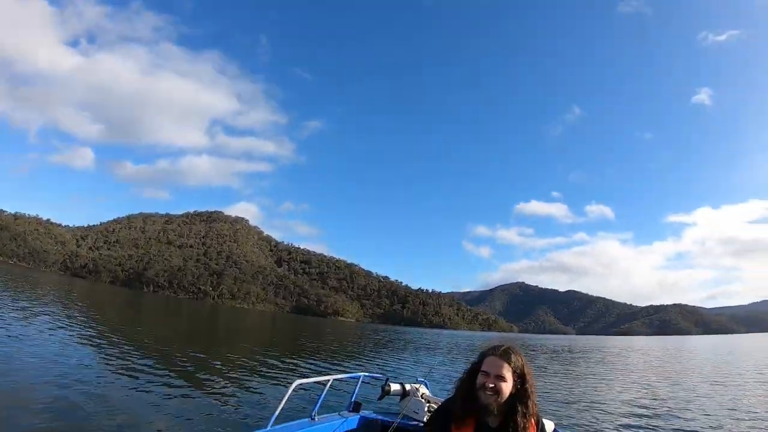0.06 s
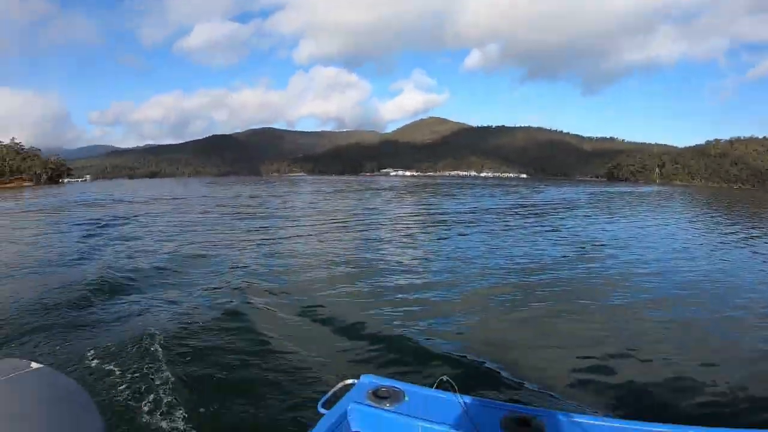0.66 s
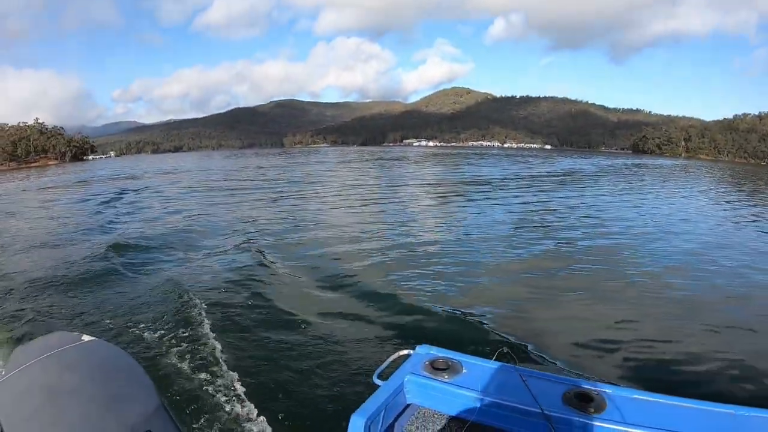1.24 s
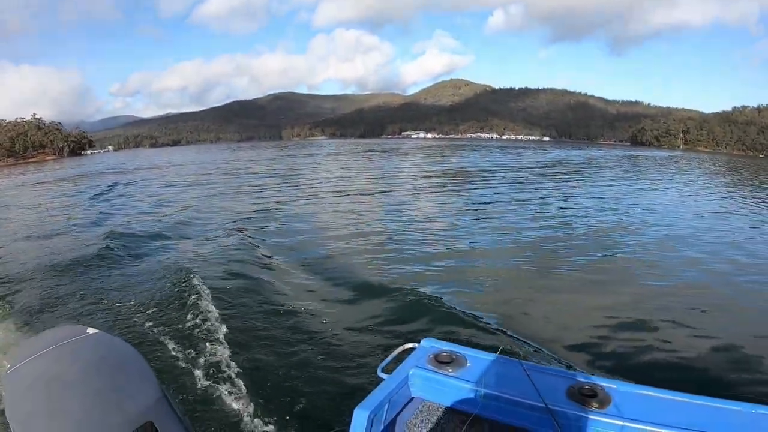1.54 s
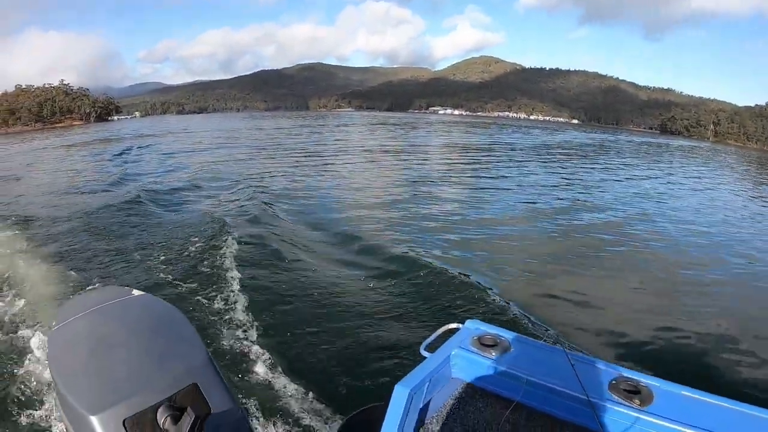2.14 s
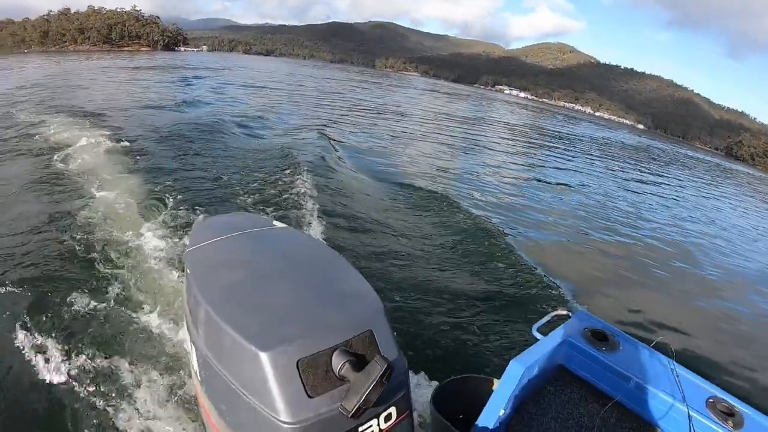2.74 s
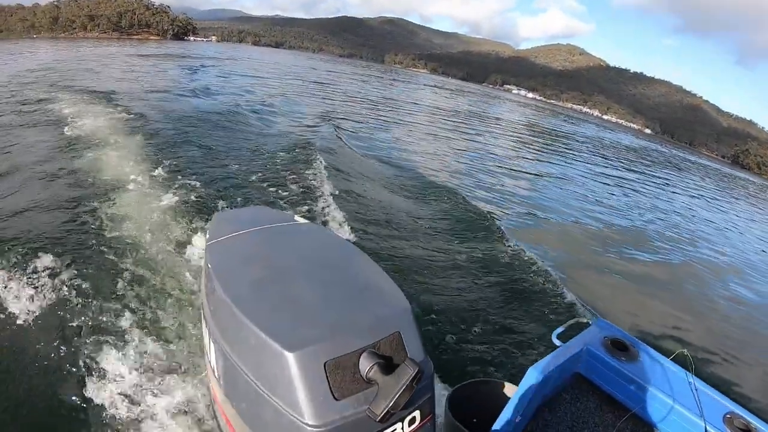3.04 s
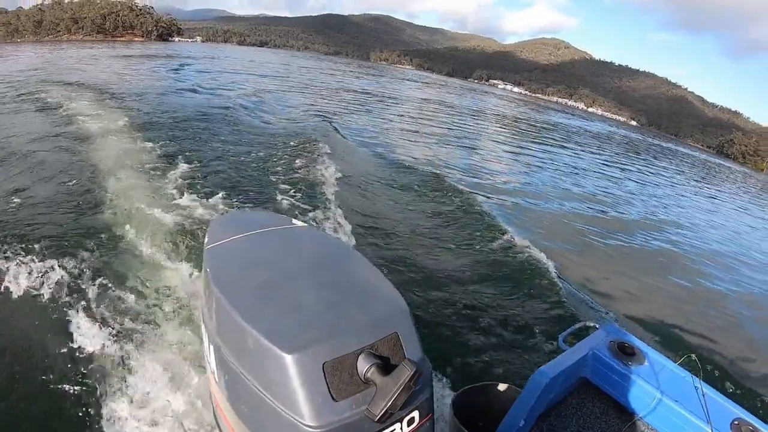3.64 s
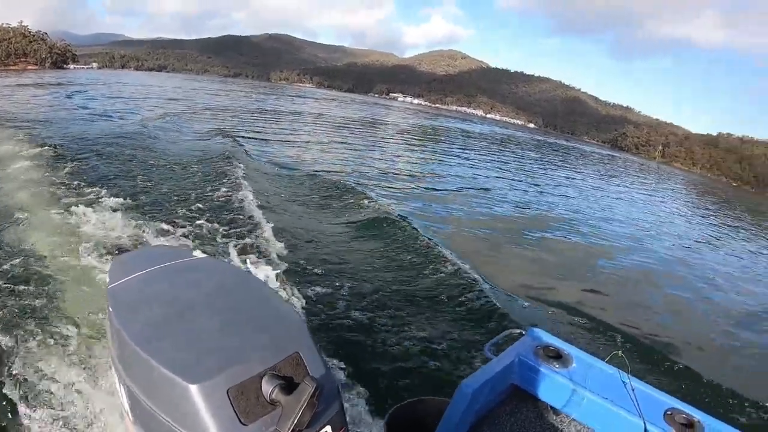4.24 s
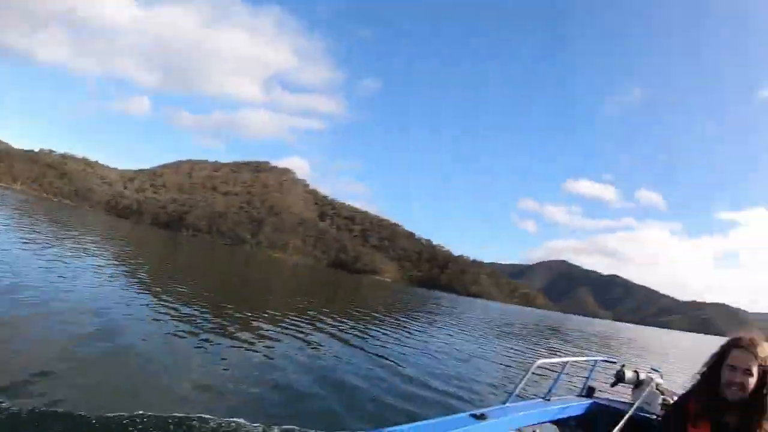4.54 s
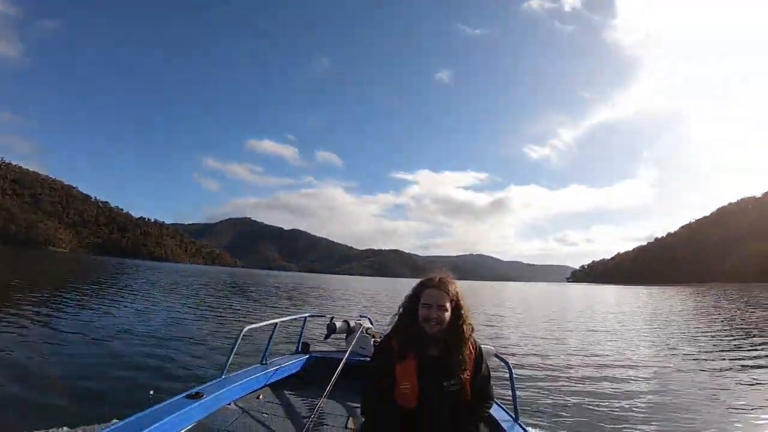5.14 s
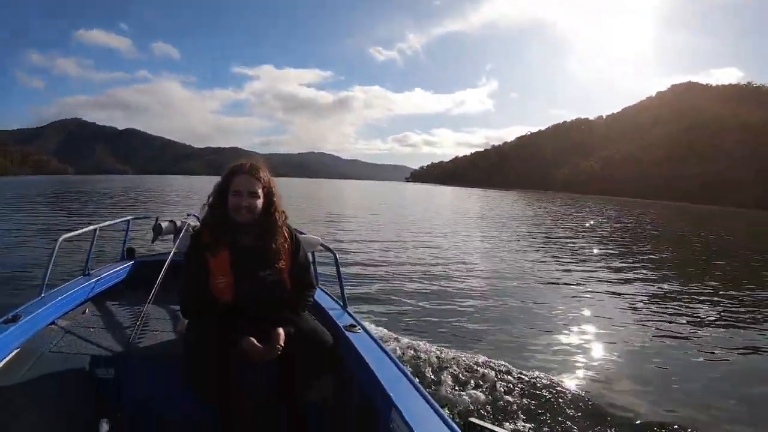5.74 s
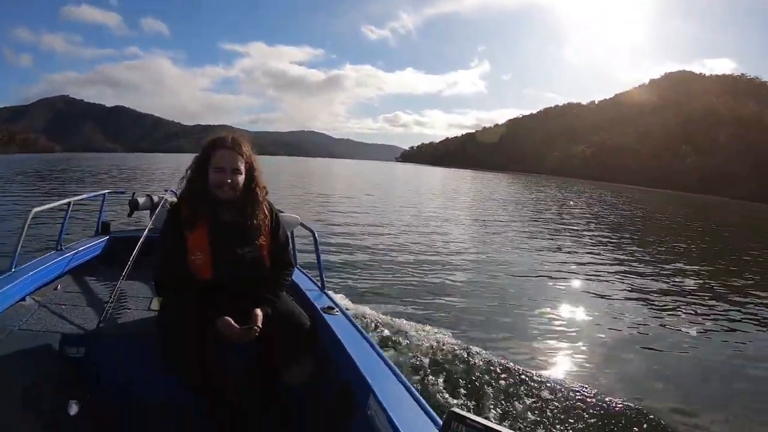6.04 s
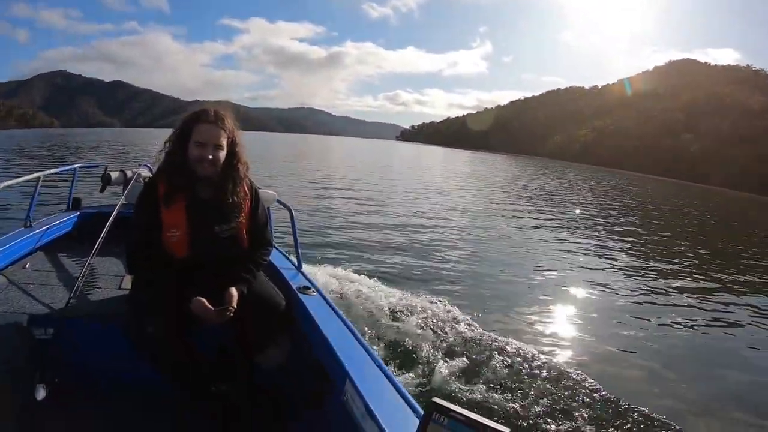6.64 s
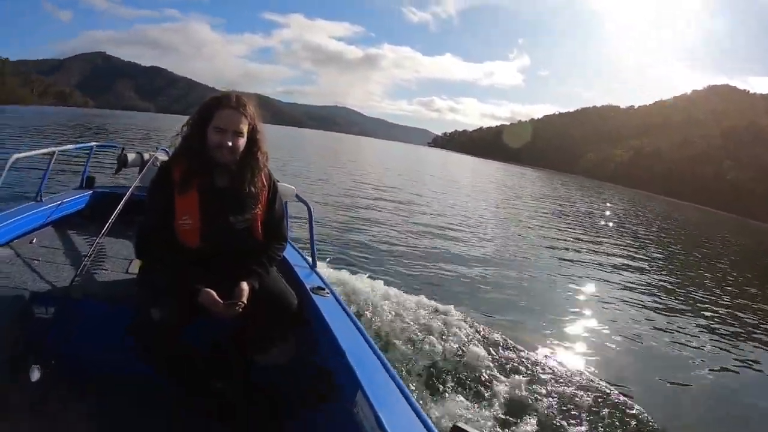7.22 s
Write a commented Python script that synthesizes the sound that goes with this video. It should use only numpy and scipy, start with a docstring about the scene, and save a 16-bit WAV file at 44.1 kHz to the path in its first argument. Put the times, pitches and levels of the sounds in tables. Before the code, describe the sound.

An outboard motor on a small metal boat runs slowly, then speeds up after about a second and settles into a throbbing, clattering cruise. Water rushes and gurgles along the hull throughout. The wake fizzes and plinks, brightest in the middle as the microphone on board turns toward the back. A few small waves slap the hull, a loose fitting chinks faintly, and light wind rumbles.

```python
"""An outboard motor lopes slowly, then picks up to a throbbing cruise, pushing a small metal boat over a lake.
Its three two-stroke cylinders boom in the hull and clatter under the cover; misfires add deep thuds.
Bubbles and drops make the wake fizz and plink, brighter when the hand-held camera on board faces back.
Small waves slap the hull, a loose fitting chinks, and a little wind rumbles on the microphone."""
import sys
import numpy as np
from scipy import signal
from scipy.fft import rfft, irfft, next_fast_len
from scipy.io import wavfile
from scipy.ndimage import uniform_filter1d

SR = 44100
rng = np.random.default_rng(int(sys.argv[2]) if len(sys.argv) > 2 else 0)


def wav_record(signal):
    """Record a signal, one row per channel, as 16-bit PCM in the file named by sys.argv[1]."""
    frames = np.transpose(np.atleast_2d(signal))
    bounded = np.clip(frames, -1, 1)
    # unit amplitude maps onto the largest positive 16-bit level
    quanta = np.round(bounded * 32767).astype(np.int16)
    wavfile.write(sys.argv[1], SR, quanta)


N = 329823
T = np.arange(N) / SR


def undb(db):
    """Turn decibels into a gain."""
    return 10 ** (np.asarray(db) / 20)

def unit(x):
    """Scale a signal to an average (rms) level of 1."""
    return x / np.sqrt(np.mean(x ** 2))

def curves(table, at=T):
    """Look up the other columns of a table by its first: by time, or by a control."""
    first, *columns = np.transpose(table)
    return [np.interp(at, first, column) for column in columns]

def wander(rate):
    """A smooth random wobble that turns about rate times a second."""
    step = int(SR / rate)
    return 0.97 * uniform_filter1d(np.repeat(rng.standard_normal(N // step + 1), step), step)[:N]

def colour(x, points):
    """Shape the tone with a curve through (Hz, dB) points."""
    hz, db = np.transpose(points)
    size = next_fast_len(N)
    bins_hz = np.maximum(np.arange(size // 2 + 1) * SR / size, 1)
    gain = undb(np.interp(np.log(bins_hz), np.log(hz), db))
    return irfft(rfft(x, size) * gain, size)[..., :N]

def ring(x, modes):
    """Pass a sound through side-by-side resonances of (Hz, width in Hz, dB)."""
    return sum(undb(db) * signal.lfilter(*signal.iirpeak(hz, max(hz / width, 1), fs=SR), x)
               for hz, width, db in modes)

def noise():
    """Two unrelated noises: mid (what both ears share) and side (how they differ)."""
    return rng.standard_normal((2, N))

# How wide the sound is. Each row: frequency in Hz, gain of the side in dB.
STEREO_WIDTH = [(60, -20), (110, -56), (200, -21.5), (380, -14), (700, -9), (1290, -5), (2380, -6.5),
                (4400, -8.5), (8120, 2), (15000, -5)]

def stereo(pair):
    """Turn mid and side into left and right; the bass stays in the middle."""
    mid, side = unit(pair[0]), colour(unit(pair[1]), STEREO_WIDTH)
    return np.array([mid + side, mid - side])

def fade(x, seconds):
    """Give every pulse a dying tail."""
    return signal.lfilter([1], [1, -np.exp(-1 / (seconds * SR))], x)

def grains(rate, spread_db):
    """About rate tiny impacts a second, most of them weak; mid and side."""
    size = undb(spread_db * np.minimum(rng.exponential(size=N), 4))
    return (rng.random(N) < rate / SR) * size * rng.choice([-1., 1.], (2, N))

def bubbles(low_hz, high_hz, cycles, spread_db, count):
    """Bubbles ring briefly and rise in pitch as they near the surface; mid and side."""
    out = np.zeros((2, N + SR))
    for when, pitch, size, life, place in rng.random((count, 5)):
        hz = low_hz + (high_hz - low_hz) * pitch
        decay = cycles * (.5 + life) * SR / hz  # in samples
        age = np.arange(int(4 * decay)) / decay
        tone = np.sin(2 * np.pi * hz * decay / SR * age * (1 + 0.0206 * age))
        tone *= np.exp(-age) * (1 - np.exp(-8 * age))
        tone *= undb(-spread_db * np.log(size + 0.017))
        start = int(when * N)
        out[:, start:start + len(age)] += np.outer([1, 2 * place - 1], tone)
    return np.array([unit(out[0, :N]), unit(out[1, :N])])

def strike(modes, hits, contact_s):
    """Each hit makes metal ring with its own notes, never twice quite alike."""
    out, age = np.zeros(N + SR), T[:SR // 4]
    rise = 1 - np.exp(-(age / contact_s) ** 2)
    for s, db in hits:
        start = int(s * SR)
        for hz, ring_s, mode_db in modes:
            size = undb(db + mode_db + rng.standard_normal())
            tail = np.exp(-np.log(1000) * age / ring_s)
            out[start:start + len(age)] += size * rise * np.sin(2 * np.pi * hz * age) * tail
    return out[:N]


# The wind's low rumble. Each row: frequency in Hz, gain in dB.
WIND_TONE = [(10,-21),(22,-6),(45,24),(80,-12),(130,10.5),(300,-44),(3000,-93)]

def wind():
    """Soft gusts rumble on the microphone, differently left and right."""
    return undb(-43.0 + 1.5 * wander(1.6)) * unit(colour(noise(), WIND_TONE))

def tick(start_s=5.3916, length_s=.0004, db=-12.5):
    """One sharp, dry tick."""
    return undb(db) * ((T >= start_s) & (T < start_s + length_s))

# The fitting's notes. Each row: pitch in Hz, seconds to fade by 60 dB, level in dB.
FITTING_NOTES = [(4130,.03,-12),(4210,.055,0),(5050,.03,-15),(6030,.04,-12)]
# Its rattles. Each row: start in seconds, relative level in dB.
FITTING_HITS = [(.644,-38),(1.052,-34),(1.159,-34),(2.623,-30),(2.726,-37),(2.888,-35),(2.933,-34),(2.948,-36),(3.153,-35),(3.275,-35),(3.54,-33),(3.811,-28),(4.231,-28),(4.272,-32),(4.462,-37),(4.479,-37),(4.789,-41),(4.852,-44)]

def chinks(db=2.0):
    """Vibration now and then rattles a loose metal fitting on the motor."""
    return undb(db) * strike(FITTING_NOTES, FITTING_HITS, contact_s=0.0017)

# The bottom plates' notes. Each row: pitch in Hz, seconds to fade by 60 dB, level in dB.
PLATE_NOTES = [(402,0.058,-16),(530,0.026,3.5),(583,0.034,-1.5),(800,.025,-6),(1130,.025,-14)]
# Waves hitting them. Each row: start in seconds, relative level in dB.
WAVE_HITS = [(1.366,-17.5),(2.202,-21),(2.676,-19),(2.693,-20),(3.609,-19),(5.141,-19.5),(5.368,-18),(5.749,-22),(5.759,-20),(5.946,-20),(5.955,-23)]

def slaps(db=-1):
    """Small waves slap the bottom of the boat and knock its plates."""
    return undb(db) * strike(PLATE_NOTES, WAVE_HITS, contact_s=.0007)

# Waves meeting the hull. Each row: loudest moment and length in seconds, level in dB, pitch in Hz.
WAVE_SLOSHES = [(0.027,0.2,-35.5,1260),(0.074,0.6,-41.5,2150),(.75,2.3,-42.5,1180),(2.615,0.27,-35,1990),(3.244,0.22,-50,2800),(5.27,2.5,-43,1860),(6.75,2.2,-46,3140)]

def sloshes():
    """Each small wave swells into a gurgle against the hull and drains away."""
    gurgle = 0.5 * bubbles(875, 3500, cycles=4.0, spread_db=0.5, count=3000) + noise()
    out = 0
    for s, length, db, hz in WAVE_SLOSHES:
        swell = np.cos(np.pi * np.clip((T - s) / length, -.5, .5)) ** 2
        band = [(hz, 0.71 * hz, 0)]
        out = out + undb(db) * swell * stereo(ring(ring(gurgle, band), band))
    return out

# Water rushing along the hull. Each row: frequency in Hz, gain in dB.
WASH_TONE = [(100,-42),(300,-16),(800,6),(1200,3.5),(1650,-2),(2050,0),(2500,-3.5),(3200,-7),(4500,-23),(12000,-70)]

def wash():
    """The wave from the front of the boat rushes and gurgles along the hull."""
    gurgle = 0.32 * bubbles(701.0, 3214, cycles=11.25, spread_db=1.5, count=4000) + noise()
    return stereo(colour(gurgle * undb(0.25 * wander(21)), WASH_TONE))

def plops(db=-15):
    """Larger bubbles break from the front wave and plop above its rush."""
    return undb(db) * stereo(bubbles(1400, 3345, cycles=6.2, spread_db=2.5, count=260))

# The hiss of fine spray. Each row: frequency in Hz, gain in dB.
SPRAY_TONE = [(800,-51),(2500,7.5),(4200,6.5),(5200,-2),(6300,1),(7500,-2.5),(8500,-8),(10500,-12.5),(11500,-17),(13000,-20),(15500,-37)]

def spray():
    """Droplets plink and patter back on the lake in showers, each band of treble flickering alone."""
    plinks = 0.35 * bubbles(4410, 11180, cycles=8.3, spread_db=2.5, count=3000)
    droplets = plinks + 0.55 * unit(grains(rate=1600, spread_db=2.0)) + noise()
    showers = sum(ring(droplets, [(hz, hz / 3, 0)]) * undb(0.8 * wander(30))
                  for hz in (3860, 5410, 7540, 9370, 12800))
    return stereo(colour(showers, SPRAY_TONE))

# Splashes in the wake. Each row: start in seconds, relative level in dB, pitch in Hz.
WAKE_SPLASHES = [(.164,-30,6800),(.994,-28,5400),(1.47,-23,8900),(2.086,-26,6000),(2.572,-28.5,3000),(2.62,-26,3300),(2.68,-34,1900),(2.785,-22,3380),(2.8,-26,3400),(2.848,-23,12000),(2.877,-28,5000),(3.079,-24,4600),(3.24,-25,6000),(3.293,-28,4900),(5.06,-28.5,6030),(5.31,-31,4800),(6.395,-32,6500),(6.623,-32,6400),(6.67,-36,6500),(6.788,-33,11000),(7.287,-29,6100),(7.31,-34,6000)]

def splashes(rise_s=0.0038):
    """The wake slops and throws a handful of drops: a short burst of hiss."""
    out, age = np.zeros(N + SR), T[:SR // 10] / rise_s
    for s, db, hz in WAKE_SPLASHES:
        band = [(hz, hz / 2, 0)]
        hiss = unit(ring(ring(rng.standard_normal(len(age)), band), band))
        start = int(s * SR)
        out[start:start + len(age)] += undb(db - 14.5) * age * np.exp(1 - age) * hiss
    return colour(out[:N], [(800, -16), (2000, 5), (4000, 5.5), (6500, -2.5), (9000, -7), (14000, -32)])

# Single big drops. Each row: start in seconds, relative level in dB, starting pitch in Hz.
BIG_DROPS = [(0.052, -38, 3860), (0.446, -34, 1950), (0.491, -41, 3820), (0.543, -44, 5220),
             (0.645, -38, 4450), (0.687, -32, 1980), (0.781, -41, 5000), (0.829, -35, 3490),
             (1.425, -41, 5730), (1.65, -39, 4630), (1.908, -36, 3640), (2.046, -42, 5370),
             (2.369, -37, 4680), (2.435, -31, 2390), (2.463, -39, 4960), (2.513, -40, 5000),
             (2.593, -35, 2240), (2.801, -38, 5840), (2.834, -31, 1840), (2.884, -36, 5070),
             (3.042, -39, 6060), (3.078, -43, 6600), (3.154, -33, 3780), (3.555, -36, 4850),
             (3.612, -30, 3820), (3.708, -43, 6100), (3.863, -35, 5550), (4.15, -39, 5330),
             (5.14, -33, 2060), (5.305, -30, 2020), (5.543, -30, 1730), (6.117, -51, 5620)]

def drops(db=-1.0, ring_s=0.032, rise_s=.002, glide_per_s=2.9):
    """The largest drops each trap a bubble that pings and rises a little in pitch."""
    out, age = np.zeros(N + SR), T[:SR // 10]
    shape = (1 - np.exp(-age / rise_s)) * np.exp(-np.log(1000) * age / ring_s)
    for s, drop_db, hz in BIG_DROPS:
        start = int(s * SR)
        ping = np.sin(2 * np.pi * hz * age * (1 + glide_per_s * age / 2))
        out[start:start + len(age)] += undb(db + drop_db) * ping * shape / shape.max()
    return out[:N]

def crackle(plink_db=-14.5, spit_db=-24):
    """Drops thrown up by the propeller plink one by one; the finest spit as they land."""
    plinks = bubbles(3100, 6100, cycles=11, spread_db=4, count=520)
    spit_tone = [(2000, -18), (5000, -3), (7000, 1), (9000, -12), (12500, -12), (15500, -26)]
    spits = colour(grains(rate=140, spread_db=5), spit_tone)
    return undb(plink_db) * stereo(plinks) + undb(spit_db) * stereo(spits)

# The fizz behind the boat. Each row: frequency in Hz, gain in dB.
WAKE_TONE = [(200,-45),(700,-7),(1000,-12),(1330,-3),(1600,-2),(2200,-4),(2800,1.5),(3300,4.5),(3900,0.5),(4180,3),(4400,-1),(5200,-2),(7000,-13),(11000,-60),(15000,-73)]

def wake():
    """The propeller leaves a dense fizz of ringing and bursting bubbles."""
    ringing = .45 * bubbles(2600, 6500, cycles=9, spread_db=2, count=4500)
    bursting = .55 * unit(grains(rate=3500, spread_db=3))
    fizz = ringing + bursting + noise()
    return stereo(colour(fizz * undb(0.38 * wander(24.08)), WAKE_TONE))

def churn(fired, lope_db=0.58, surge_db=0.92):
    """The water's level surges at random and heaves with every second and third engine turn."""
    lope = np.cos(2 * np.pi * fired / 6) + np.cos(2 * np.pi * fired / 9)
    return undb(lope_db * lope + surge_db * wander(28))

# The water by direction. Each row: degrees from straight back, then wash, wake and spray in dB.
WATER_LEVELS = [(10.1,-36,-40,-45),(45,-40,-44.5,-48.5),(72,-37.5,-51.5,-48.5),(105,-41,-60,-53.5),(158.3,-38,-50.5,-49.5),(172.4,-41,-55,-53.5)]

def water(fired, bearing):
    """All the water churns together; wake and spray are loudest behind and faintest to the side."""
    wash_db, wake_db, spray_db = curves(WATER_LEVELS, bearing)
    return churn(fired) * (undb(wash_db) * (wash() + plops())
                           + undb(wake_db) * (wake() + crackle())
                           + undb(spray_db) * spray() + sloshes())

# The middles of three treble bands, in Hz.
SHADE_BANDS = [6100, 8300, 11000]
# The camera's sound shadow. Each row: degrees from straight back, then each band's gain in dB.
SHADE_GAINS = [(10,0,-2.5,0.5),(47,-.5,2,-0.5),(70,-3,2,0.5),(100,-7,1.5,0),(157,1.5,1.5,-4),(166.5,0,-0.5,4),(172,1,0,-0.5)]

def shaded(x, bearing):
    """As the camera turns, its body lifts or shades bands of the treble."""
    return x + sum((undb(db) - 1) * ring(x, [(hz, 0.24 * hz, 0)])
                   for hz, db in zip(SHADE_BANDS, curves(SHADE_GAINS, bearing)))

def firings(fired, cruise, strong_db=2.0, second_db=4, third_db=3.5, scatter_db=2.0):
    """One pulse a firing; on light load the strongest cylinder burns fully every second or third turn."""
    at = np.flatnonzero(np.diff(np.floor(fired)))
    k = np.arange(len(at))
    strongest, second_turn, third_turn = k % 3 == 0, k % 6 == 0, k % 9 == 3
    boosts_db = [strong_db * strongest, second_db * cruise[at] * second_turn, third_db * third_turn]
    pulses = np.zeros(N)
    pulses[at] = undb(np.max(boosts_db, axis=0) + scatter_db * (2 * rng.random(len(at)) - 1))
    return pulses

def intake(pulses):
    """Air rasps through the motor's intake, once a firing."""
    air = noise() * (unit(fade(pulses, 0.0033)) + 0.55)
    rasp = ring(air, [(1120, 330, -1), (1324, 110, 0)])
    return stereo(ring(rasp, [(1250, 210, 0)]))

# The clatter of moving parts. Each row: frequency in Hz, gain in dB.
CLATTER_TONE = [(100,-43),(250,-22),(420,4.5),(620,-2.5),(850,-2),(1150,-11),(1600,-11.5),(2500,-17.5),(5000,-43),(12000,-81)]
# Where the motor's cover rings. Each row: pitch in Hz, width in Hz, gain in dB.
COVER_NOTES = [(607,153,4.5),(782,72,-13),(1003,28,2.5),(1099,25,4),(1240,220,-4),(2040,94,-7)]

def clatter(pulses):
    """Pistons and gears knock with each firing and make the cover ring."""
    knocks = noise() * (unit(fade(pulses, 0.011)) + 0.36)
    cover_tone = [(100, -45), (250, 3.5), (550, 2), (2000, -8), (5000, -23), (12000, -57)]
    cover = colour(ring(knocks, COVER_NOTES), cover_tone)
    return undb(-3.5) * stereo(colour(knocks, CLATTER_TONE)) + undb(-4.0) * stereo(cover)

# The tone an octave above the hum. Each row: time in seconds, level in dB.
OCTAVE_LEVELS = [(0,-31),(.7,-30.5),(1.7,-32),(3,-51),(3.15,-25),(3.8,-26.5),(4.25,-29),(4.45,-24.5),(4.68,-37),(4.82,-25.5),(4.93,-32.5),(5.03,-27),(5.2,-31.5),(5.38,-42.5),(5.72,-24.5),(6.08,-29),(6.35,-26.5),(6.7,-25.5),(6.88,-29.5),(7.48,-27)]
# The hull's shaking. Each row: shakes in six engine turns, level in dB when slow, then at cruise.
HULL_SHAKES = [(4,-46,-42),(6,-36,-41.5),(8,-28,-40),(10,-30.5,-37.5),(12,-33,-39),(14,-22,-41),(21,-45,-37),(22,-34.5,-41),(24,-37.5,-39),(26,-33.5,-38),(28,-35,-35),(30,-32,-40.5),(45,-40,-35),(54,-60,-43)]

def drone(fired, cruise, hum_db):
    """Clean low tones follow the engine's speed: the firings hum and the hull shakes."""
    angle = 2 * np.pi * fired
    hum = undb(hum_db + 0.15 * wander(36)) * np.sin(angle)
    octave = undb(curves(OCTAVE_LEVELS)[0]) * np.sin(2 * angle)
    shake = 0
    for cycles, slow_db, cruise_db in HULL_SHAKES:
        shift = cycles ** 2 / 7  # the hull delays each tone differently, so they never add up to a knock
        tone = np.sin(cycles * angle / 18 + shift) * undb(wander(4))
        shake = shake + undb(np.interp(cruise, [0, 1], [slow_db, cruise_db])) * tone
    return np.sqrt(2) * (hum + octave + shake)

# Where the hull booms. Each row: pitch in Hz, width in Hz, gain in dB.
HULL_NOTES = [(130,99,-18),(185,20,7),(254,140,2),(290,25,-1.5),(346,140,3.5),(405,18,-13),(610,120,-5)]
# Exhaust bubbling under water. Each row: frequency in Hz, gain in dB.
BURBLE_TONE = [(50,-39),(80,-1),(105,-1),(135,0.5),(180,0.5),(210,-3.5),(245,-1),(290,-1.5),(380,-1),(440,-10),(650,-19.5),(1100,-52),(4000,-90)]

def exhaust(pulses):
    """Each firing booms in the hull and blows a burst of bubbles under the back of the boat."""
    boom_tone = [(70, -19.5), (135, 16), (600, -8), (1500, -18), (8000, -75)]
    boom = unit(colour(ring(pulses, HULL_NOTES), boom_tone))
    puffs = noise() * (unit(fade(pulses, 0.0023)) + 1.1)
    return undb(-15.0) * boom + undb(-2) * stereo(colour(puffs, BURBLE_TONE))

# Runs of throbs. Each row: start in seconds, number of throbs, misfires in each, relative level in dB.
MISFIRE_RUNS = [(.975,1,2,-17.5),(1.155,1,1,-13.5),(1.235,1,2,-15),(1.405,1,2,-15),(1.647,1,2,-15),(1.803,1,1,-14.5),(1.887,1,2,-15),(2.041,1,1,-14),(2.125,1,2,-15),(2.281,1,1,-15),(2.363,1,1,-15),(2.438,18,2,-14.5),(5.235,1,1,-14.5),(5.395,1,1,-15),(5.516,6,2,-14.8),(6.525,4,2,-15.3),(7.217,2,2,-14.3)]

def throbbing(fired, thud_hz=58, rise_s=.0155, sharpness=1.05, db=0.7, vary_db=0.5):
    """On part throttle one cylinder misfires, mostly in pairs; each misfire thuds in the hull."""
    out, age = np.zeros(N + SR), T[:SR // 5]
    swell = (age / rise_s * np.exp(1 - age / rise_s)) ** sharpness
    thud = swell * np.sin(2 * np.pi * thud_hz * age)
    for s, throbs, misfires, run_db in MISFIRE_RUNS:
        # throbs come 18 firings apart, the misfires within one 6 apart
        later = np.add.outer(18 * np.arange(throbs), 6 * np.arange(misfires)).ravel()
        for when in np.interp(np.interp(s, T, fired) + later, fired, T):
            start = int((when - rise_s) * SR)
            out[start:start + len(age)] += undb(db + run_db + vary_db * rng.standard_normal()) * thud
    return out[:N]

# The motor by direction. Each row: degrees from straight back, then hum, exhaust, clatter, intake in dB.
MOTOR_LEVELS = [(10,-22.5,-20.5,-30,-40),(45,-22.5,-19.5,-29.5,-55),(97,-27.5,-25,-38,-73),(162.6,-26,-22,-35,-70),(181.4,-22.5,-25,-36,-73)]

def motor(fired, bearing, throttle_opens_s=(0.97, 1.21), hum_builds_s=(1.2, 1.6)):
    """The motor grows louder as the throttle opens; the camera's direction sets the mix of its parts."""
    hum_db, exhaust_db, clatter_db, intake_db = curves(MOTOR_LEVELS, bearing)
    hum_db += np.interp(T, hum_builds_s, [-4.5, 0])
    cruise = np.interp(T, throttle_opens_s, [0, 1])
    slow_db = -2 * (1 - cruise)
    chug_db = 0.87 * cruise * np.cos(2 * np.pi * (fired - 1.84) / 6)  # swells every second turn
    lope_db = 1.05 * cruise * np.cos(2 * np.pi * (fired - 4) / 9)  # swells every third turn
    pulses = firings(fired, cruise)
    return (throbbing(fired) + drone(fired, cruise, hum_db)
            + undb(exhaust_db + slow_db + chug_db) * exhaust(pulses)
            + undb(clatter_db + slow_db + lope_db) * clatter(pulses)
            + undb(intake_db) * intake(pulses))

# The engine's speed. Each row: time in seconds, firings a second.
FIRING_RATE = [(0,89),(.25,88.3),(.7,92.6),(.9,93.3),(1.35,110),(1.9,113.1),(2.6,113.7),(2.8,112.6),(3.25,117.3),(3.85,118),(4.55,117),(5.05,116.2),(5.4,112),(5.55,116),(6.7,115.7),(6.9,118),(7.48,117.5)]
# Where the camera points. Each row: time in seconds, degrees from straight back.
CAMERA_BEARING = [(0,145),(.25,174),(.41,95),(.58,68),(.8,54),(1.1,45.4),(2.3,49.4),(2.7,13),(4.35,11),(4.49,61),(4.58,75),(4.7,113),(4.95,157),(5.45,161),(5.8,176),(6.5,170),(7,166),(7.48,161)]

def scene():
    """The engine sets the rhythm; water and wind lie around it as the camera turns."""
    fired = np.cumsum(curves(FIRING_RATE)[0]) / SR  # firings so far, three to an engine turn
    bearing = curves(CAMERA_BEARING)[0]
    lake = shaded(water(fired, bearing), bearing) + splashes() + drops() + slaps()
    return motor(fired, bearing) + chinks() + lake + wind() + tick()

# The microphone's balance. Each row: frequency in Hz, left minus right in dB.
MIC_BALANCE = [(125,-0.3),(300,1.0),(600,-0.8),(1300,-1.4),(2600,0.6),(5000,0.9),(9000,0.8)]

def record(dry, top_hz=15700):
    """Left and right differ a little in tone, and the camera cuts the highest treble."""
    sides = [colour(x, [(hz, sign * db / 2) for hz, db in MIC_BALANCE]) for x, sign in zip(dry, (1, -1))]
    end_fades = np.minimum(np.minimum(T, T[-1] - T) / .004, 1)
    treble_cut = signal.ellip(8, .2, 70, top_hz, fs=SR, output="sos")
    return signal.sosfilt(treble_cut, end_fades * np.array(sides))


dry = scene()
out = record(dry)
wav_record(out)
```